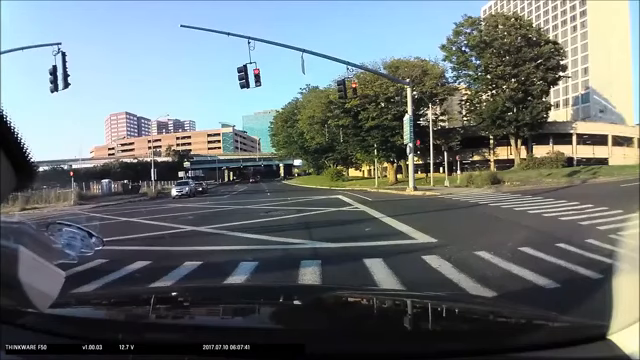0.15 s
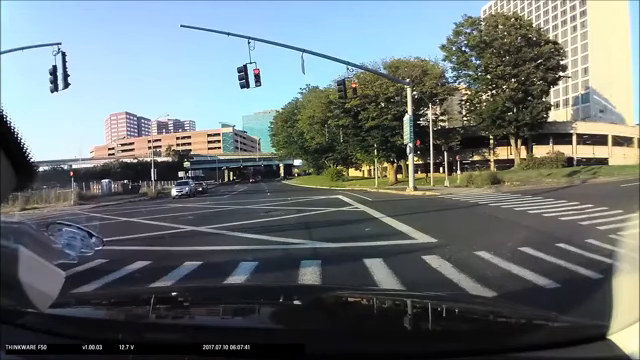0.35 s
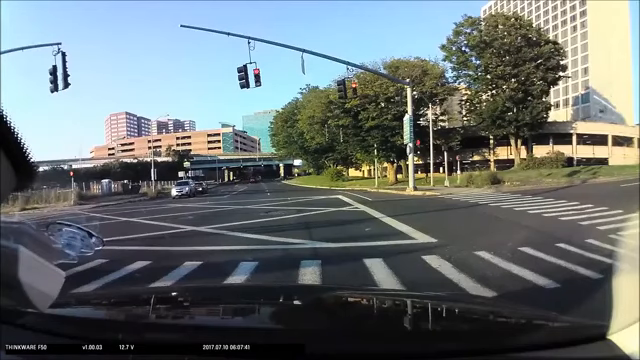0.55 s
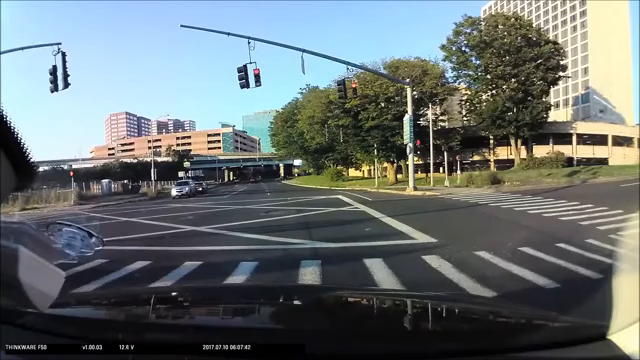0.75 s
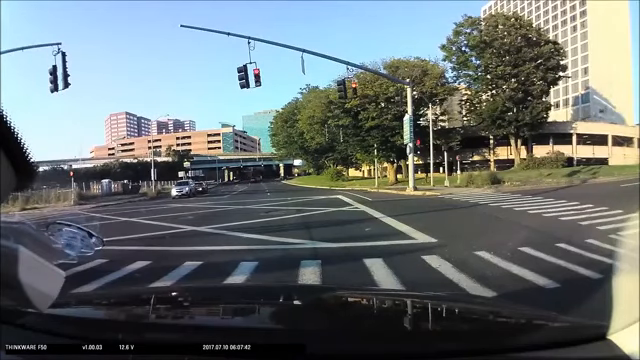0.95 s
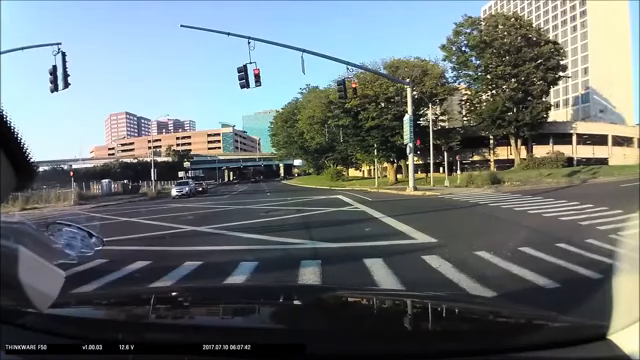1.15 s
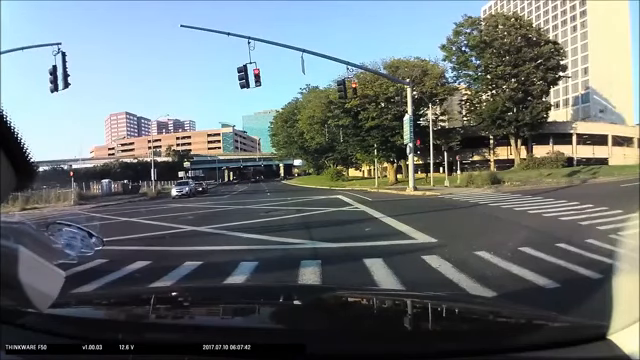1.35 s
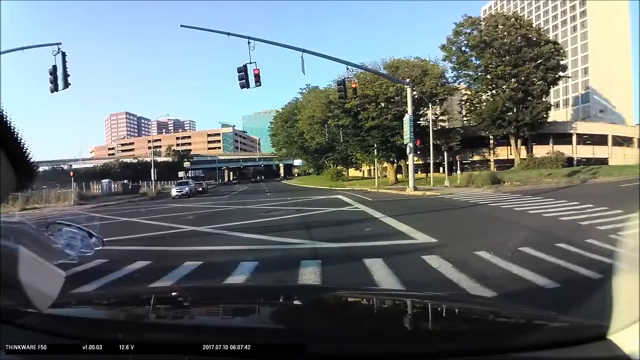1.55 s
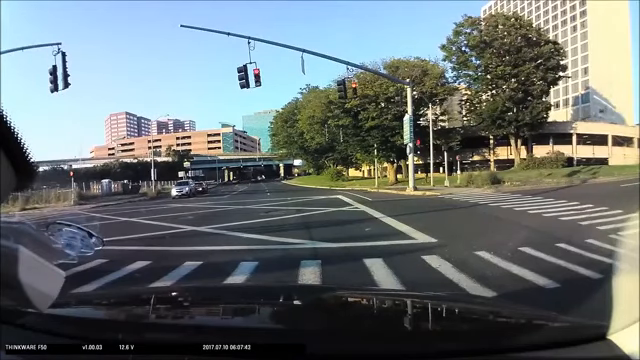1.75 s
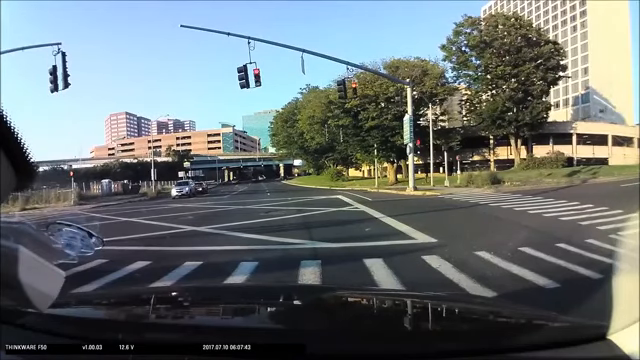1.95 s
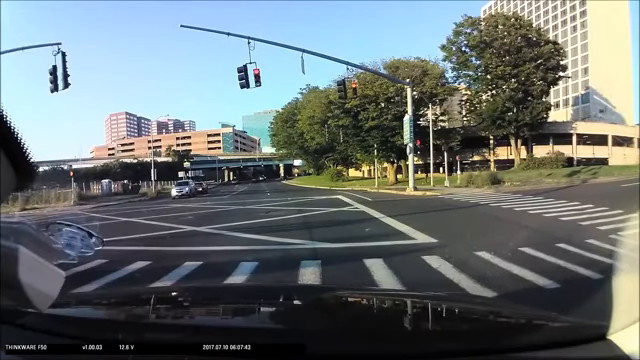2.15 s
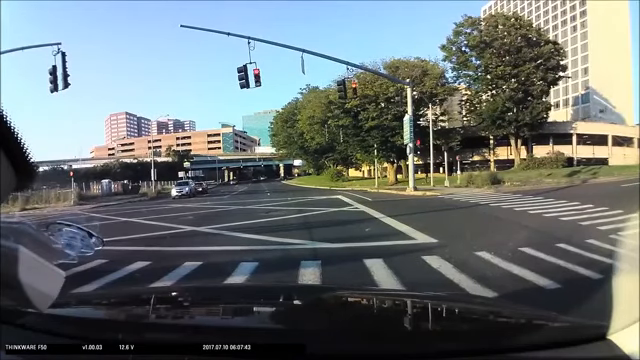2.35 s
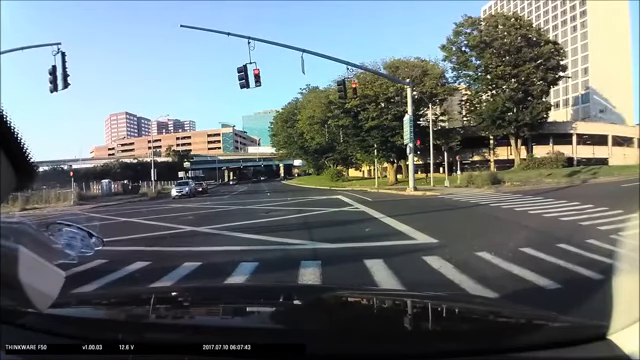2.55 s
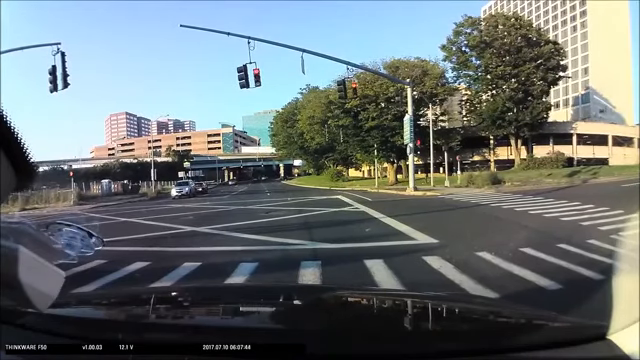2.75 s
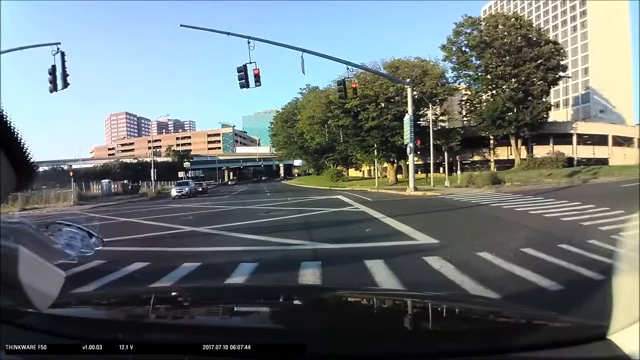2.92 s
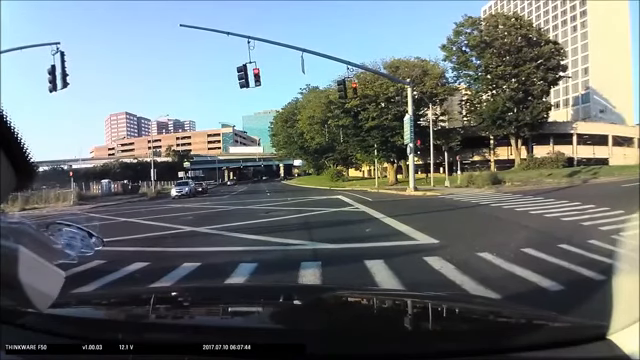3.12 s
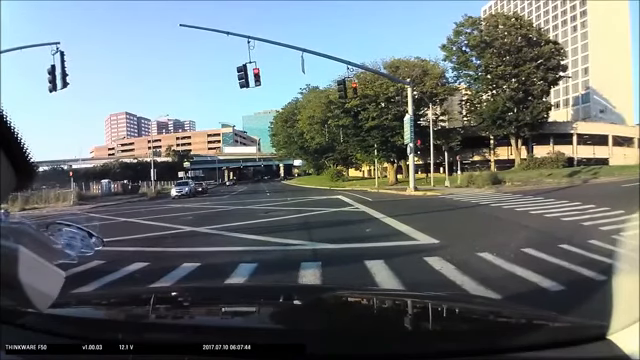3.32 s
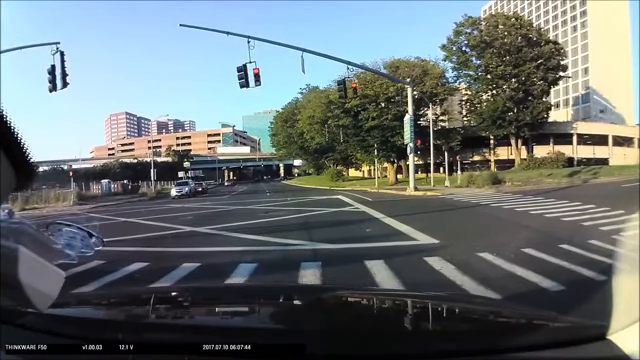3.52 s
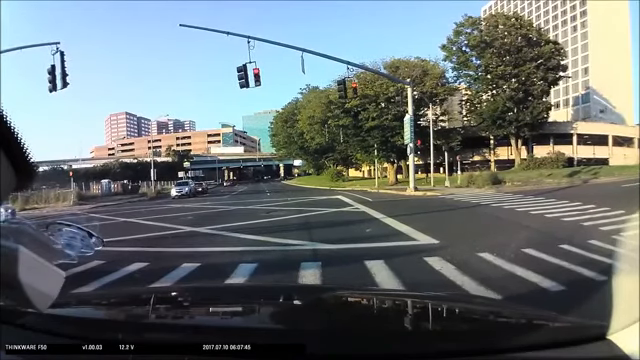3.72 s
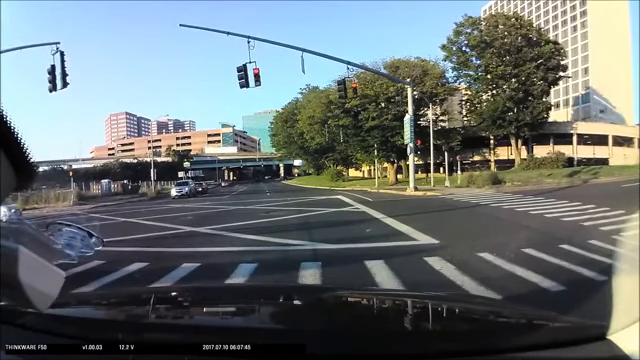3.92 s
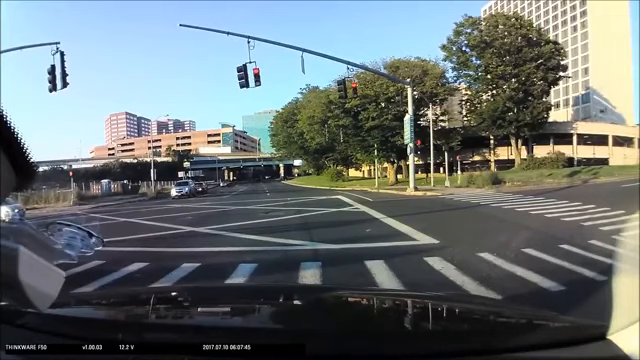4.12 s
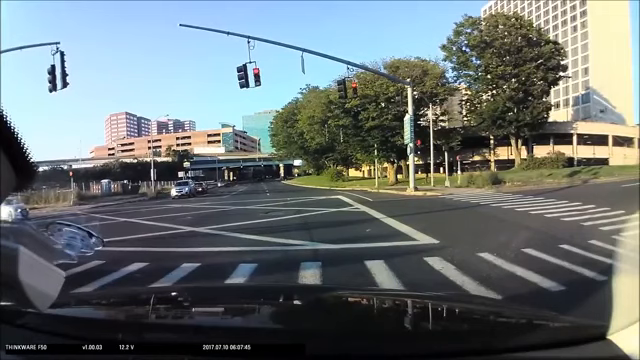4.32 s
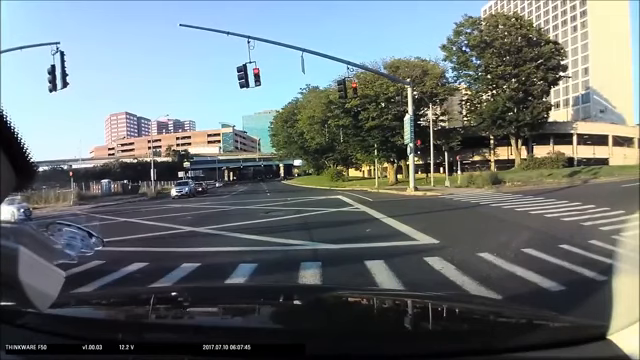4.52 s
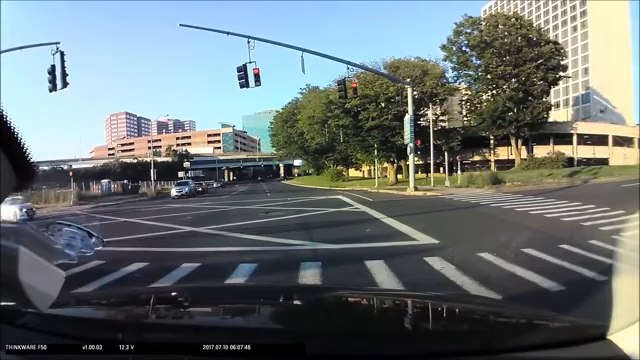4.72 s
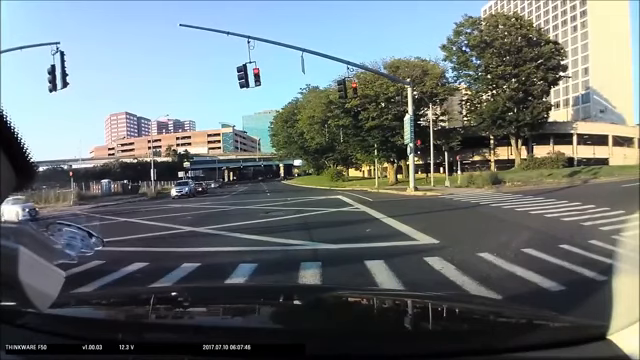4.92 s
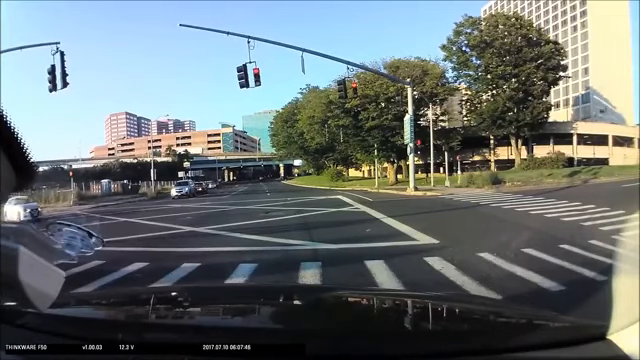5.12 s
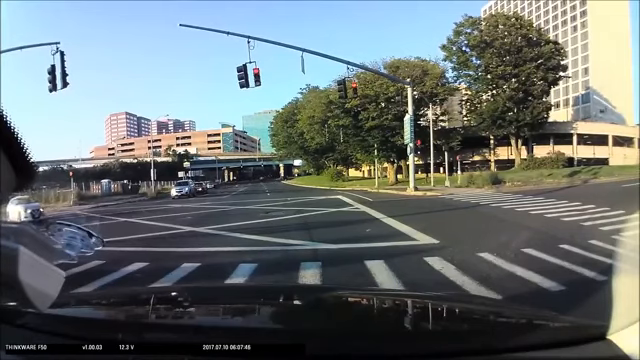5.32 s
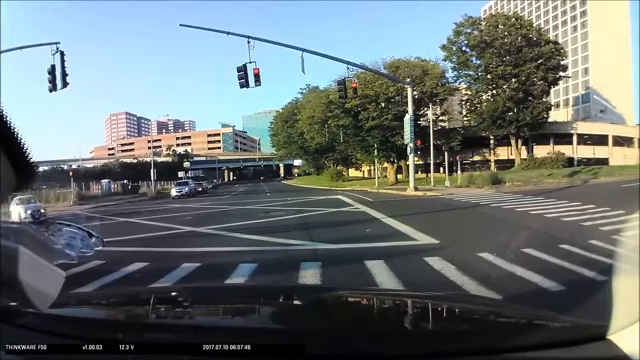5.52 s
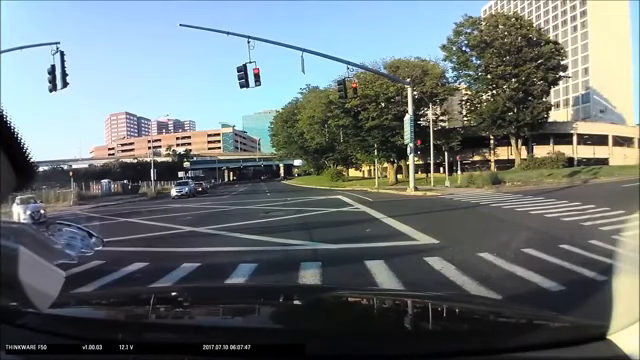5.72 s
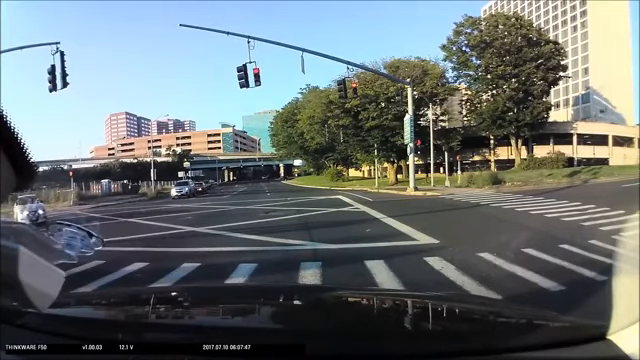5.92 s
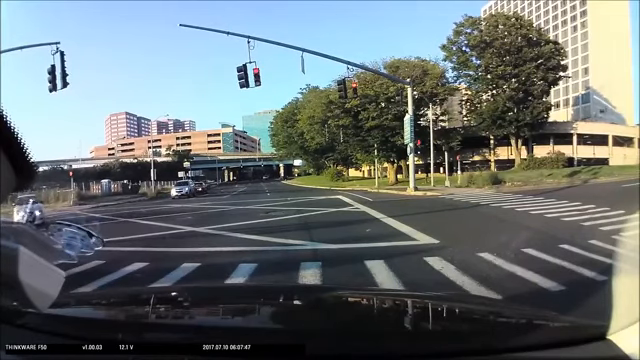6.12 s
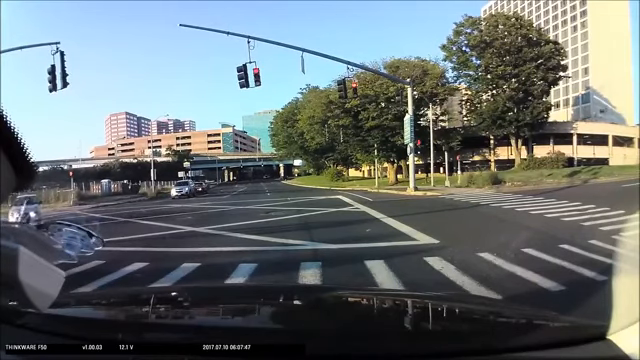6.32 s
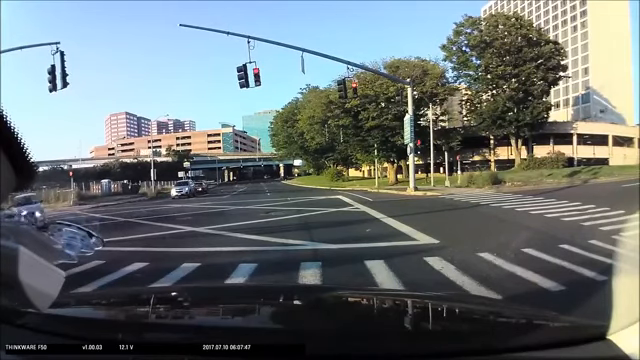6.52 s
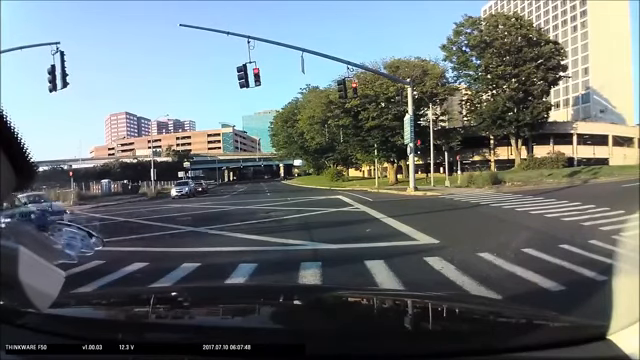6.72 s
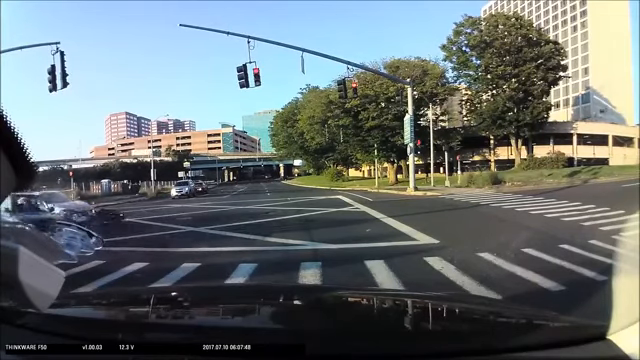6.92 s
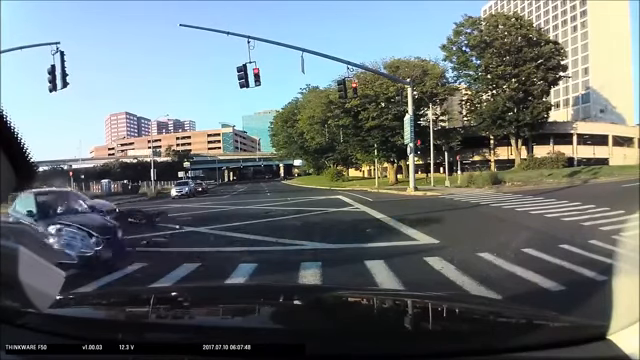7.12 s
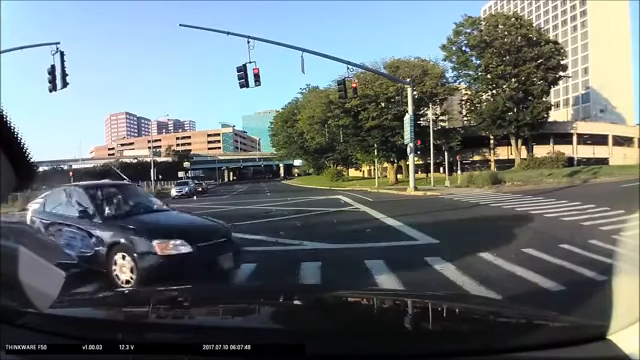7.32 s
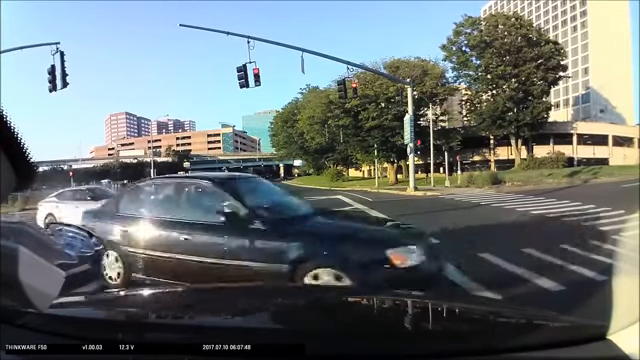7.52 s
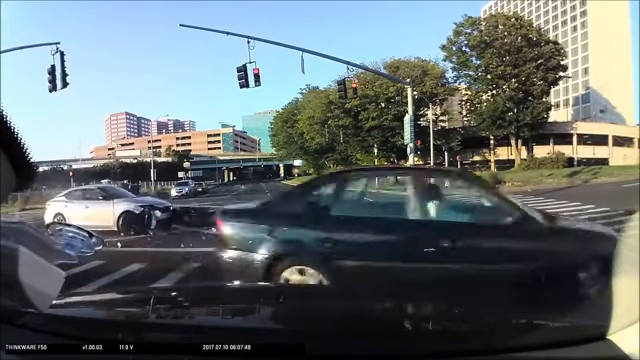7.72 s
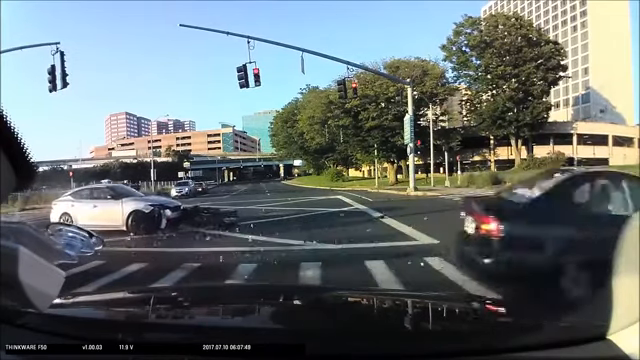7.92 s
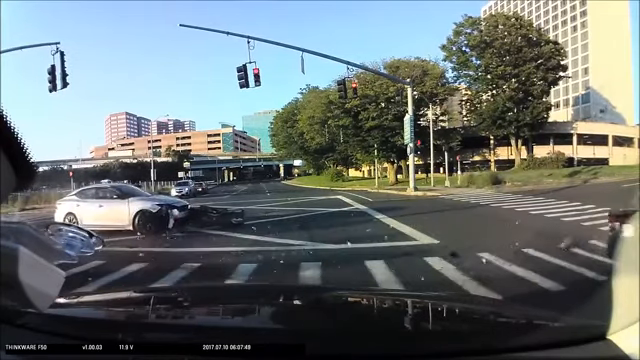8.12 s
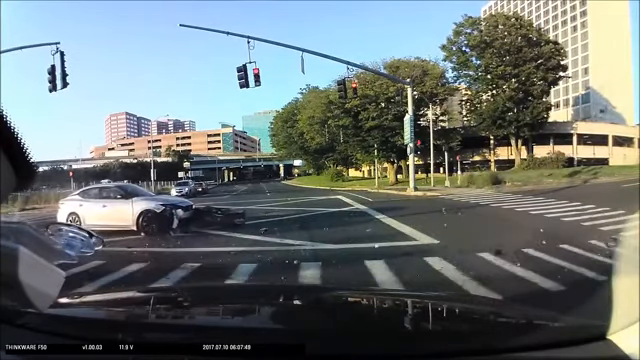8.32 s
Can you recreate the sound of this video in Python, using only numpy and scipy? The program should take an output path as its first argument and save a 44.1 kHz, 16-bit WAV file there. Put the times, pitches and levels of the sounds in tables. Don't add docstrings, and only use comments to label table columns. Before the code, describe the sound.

A quiet car cabin at a crossing, engine idling unevenly under thin electronic hiss. Small plastic clicks accompany a passing lorry's deep drone and loose rattles; later relay ticks come at regular intervals. A close, muffled smash erupts outside, followed by scraping, tyre squeal and ringing sheet metal. Debris knocks the doors and glass, the body booms, and a second cluster of crunches ends it.

```python
import sys
import numpy as np
from scipy import signal
from scipy.fft import rfft, irfft, next_fast_len
from scipy.io import wavfile
from scipy.ndimage import map_coordinates

SR = 44100
rng = np.random.default_rng(int(sys.argv[2]) if len(sys.argv) > 2 else 0)


def boost_factor(decibels):
    exponent = np.asarray(decibels, float) / 20
    return 10 ** exponent


def dump_mix(stems):
    frames = np.atleast_2d(stems).T
    limited = np.clip(frames, -1, 1)
    pcm = np.round(limited * 32767).astype(np.int16)
    wavfile.write(sys.argv[1], SR, pcm)


N = 373086
T = np.arange(N) / SR


def unit(x):
    return x / np.sqrt(np.mean(x ** 2) + 1e-20)


def curves(rows):
    s, *cols = np.transpose(rows)
    return [np.interp(T, s, c) for c in cols]


def during(rows, fade=0.071):
    return np.clip(np.minimum(T - rows[0][0], rows[-1][0] - T) / fade + 1, 0, 1)


def wobble(rate):
    return map_coordinates(rng.standard_normal(int(N * rate / SR) + 4), [T * rate])


def filtered(x, response):
    m = next_fast_len(N + SR // 2)
    return irfft(rfft(x, m) * response(np.fft.rfftfreq(m, 1 / SR)), m)[:N]


def resonances(modes):
    def response(f):
        total = 0
        for k, (c, w, db) in enumerate(modes):
            total = total + (-1) ** k * boost_factor(db) * 1j * f * w / (c * c - f * f + 1j * f * w)
        return total
    return response


def noise(spectrum, grain_db=0, grain_rate=100):
    f, db = np.transpose(spectrum)
    white = rng.standard_normal(N)
    if grain_db:
        white = white * boost_factor(grain_db * wobble(grain_rate))

    def colour(hz):
        return boost_factor(np.interp(np.log(hz + 1), np.log(f + 1), db, -150, -150))
    return unit(filtered(white, colour))


def tone(hz, blur_hz):
    return np.sqrt(2) * np.sin(2 * np.pi * np.cumsum(hz + blur_hz * wobble(blur_hz + 1)) / SR)


def rough(hz, width_hz):
    turn = 2 * np.pi * np.cumsum(hz) / SR
    return unit(wobble(width_hz) * np.sin(turn) + wobble(width_hz) * np.cos(turn))


def bursts(times, levels_db, t60, rise):
    power, t = np.zeros(N + SR), np.arange(SR // 2) / SR
    shape = (boost_factor(-60 * t / t60) * (1 - np.exp(-t / rise))) ** 2
    for s, db in zip(times, levels_db):
        power[round(s * SR):][:len(t)] += boost_factor(2 * db) * shape
    return np.sqrt(power[:N])


def ringing(rows, t60, rise, grain_db=0):
    out, t = np.zeros(N + SR), np.arange(SR) / SR
    for s, db, hz in rows:
        envelope = boost_factor(db - 60 * t / t60) * (1 - np.exp(-t / rise))
        out[round(s * SR):][:SR] += envelope * np.sin(2 * np.pi * hz * t)
    return out[:N] * boost_factor(grain_db * wobble(140))


# pitch_hz, level_db (per Hz)
HISS_COLOUR = [(2300, -40), (3800, -11), (5600, -12), (6000, -4), (7300, -2), (7900, -9), (9300, -3),
               (11200, -2), (11700, -12), (12100, -8), (12900, -9), (13300, -14), (15000, -14)]
# pitch_hz, level_db
CLOCK_TONES = [(6002, -88), (6998, -94), (7327, -97), (9001, -85), (10002, -109), (10998, -80.5),
               (11999, -104), (13001, -101)]
# time_s, pitch_hz, level_db
SUPPLY_WHINE = [(0, 13935, -83), (1.78, 13900, -82), (1.81, 13200, -92), (2.1, 13450, -83),
                (3.45, 13400, -85), (4.22, 13810, -86), (4.27, 13430, -82), (7.2, 13430, -84),
                (7.5, 13200, -95)]
# start_s, level_db
SUPPLY_CLICKS = [
    (1.8007, -55),
    (2.262, -59),
]


def electronics():
    hz, whine_db = curves(SUPPLY_WHINE)
    hiss = boost_factor(-70.5) * noise(HISS_COLOUR, grain_db=1.0, grain_rate=190)
    clock = sum(boost_factor(level + 2) * np.sin(2 * np.pi * f * T) for f, level in CLOCK_TONES)
    whine = boost_factor(whine_db) * rough(hz, width_hz=120)
    click_noise = noise([(2500, -14), (4000, -10), (14000, -9)])
    clicks = bursts(*np.transpose(SUPPLY_CLICKS), t60=0.03, rise=.0003) * click_noise
    return hiss + clock + whine + clicks


# time_s, roar_db
TRAFFIC = [(0, -70), (1.6, -69), (2.1, -70.5), (2.7, -69.5), (4.27, -70), (5.3, -68), (5.9, -65),
           (6.29, -61), (6.66, -61)]
# pitch_hz, level_db (per Hz)
ROAR_COLOUR = [(240, -50), (400, -6), (581, -3.5), (767, -6), (901, -3), (1200, -4.5), (1500, -7),
               (1650, -2.5), (2080, -16.5), (2300, -12), (2990, -52), (5060, -120)]
# pitch_hz, level_db (per Hz)
TYRE_HISS_COLOUR = [(1800, -12), (2300, -18.5), (2600, -3), (2800, -4.5), (3020, -0.5), (3300, -7),
                    (3550, -20), (4500, -32)]


def street():
    roar_db, = curves(TRAFFIC)
    far_db = -69.5
    hiss_db = -71.5 + 1.22 * (roar_db - far_db)
    swell = .7 * wobble(5)
    roar = boost_factor(roar_db + swell + 2.5) * noise(ROAR_COLOUR)
    hiss = boost_factor(hiss_db + swell + 1.1 * wobble(14)) * noise(TYRE_HISS_COLOUR, grain_db=1.0)
    return (T < WRECK_SLIDE[0][0]) * (roar + hiss)


# time_s, cycles_done (engine cycles)
CRANK_TURNS = [(0, -.065), (1.5, 8.901), (2.5, 14.821), (3, 17.798), (5, 29.814), (6, 35.773), (8.5, 50.62)]
# place (0-1 of a cycle), boom_db, panel_db
CYLINDER_FIRINGS = [
    (.03, -4.5, -6),
    (.235, -6.5, -12),
    (.51, 0, 0),
    (.745, -4.5, -6),
]
# pitch_hz, spread_hz
CABIN_BOOM = (197, 20.5)
# pitch_hz, width_hz, level_db
FLOOR_PANELS = [(262, 26.4, -2), (335, 11.3, -5.5)]
# multiple, level_db
FIRING_HUM = [(1, -51.5), (2, -55), (3, -57.5), (4, -53.5), (5, -55)]
# pitch_hz, level_db (per Hz)
IDLE_SHAKE = [(4, -32), (8, -19), (43, 13), (104, -11.5), (150, -29), (200, -3), (330, -8.5), (400, -26),
              (520, -24), (900, -55)]


def engine():
    s, done = np.transpose(CRANK_TURNS)
    boom, panel = np.zeros(N), np.zeros(N)
    chance = rng.standard_normal((len(CYLINDER_FIRINGS), 52, 2))
    for (place, boom_db, panel_db), luck in zip(CYLINDER_FIRINGS, chance):
        at = np.interp(np.arange(-1, 51) + place, done, s) + .0003 * luck[:, 0]
        keep = (at > 0) & (at < T[-1] - .02)
        size_db = .9 * luck[keep, 1]
        boom[(at[keep] * SR).astype(int)] = boost_factor(boom_db + size_db)
        panel[((at[keep] + .002) * SR).astype(int)] = boost_factor(panel_db + size_db)

    def swell(f):
        return np.exp(-.5 * ((f - CABIN_BOOM[0]) / CABIN_BOOM[1]) ** 2)

    def floor(f):
        return resonances(FLOOR_PANELS)(f) ** 2
    pulses = boost_factor(-44.5) * unit(filtered(boom, swell)) + boost_factor(-54) * unit(filtered(panel, floor))
    turn = 2 * np.pi * (4 * np.interp(T, s, done) + .2)
    hum = sum(boost_factor(db + 3 + 2.5 * wobble(3)) * np.sin(k * turn) for k, db in FIRING_HUM)
    return pulses + boost_factor(-4.5) * hum + boost_factor(-47.5) * noise(IDLE_SHAKE)


# time_s, pitch_hz, level_db
EXHAUST = [(1.72, 21.03, -60), (2.0, 21.8, -52), (2.08, 24.1, -25), (2.36, 27.4, -34), (2.45, 28.44, -31),
           (3.17, 32.5, -32.5), (3.23, 28.97, -41), (4.33, 26.47, -34), (4.9, 33.7, -46.5)]
# start_s, level_db
LURCHES = [
    (1.798, -26.5),
    (1.95, -31),
    (2.07, -26.5),
    (2.2, -38),
    (3.5, -35),
    (4.17, -30),
    (4.53, -33.5),
]
# start_s, end_s, pitch_hz, level_db
BRAKE_SQUEAKS = [
    (2.583, 2.802, 3080, -71.5),
    (3.172, 3.325, 2590, -77),
    (3.2, 3.265, 3170, -71),
]


def lorry():
    hz, db = curves(EXHAUST)
    s, lurch_db = np.transpose(LURCHES)
    note = boost_factor(db + 2.6 * wobble(9.1)) * tone(hz, blur_hz=1.3)
    push = np.hypot(boost_factor(db - 12), bursts(s, lurch_db, t60=0.62, rise=0.047))
    upper = push * noise([(30, -47.0), (42, -13.5), (54, 11), (64, -12), (90, -72.0)])
    shake = np.hypot(boost_factor(-74), bursts(s, lurch_db - 28.5, t60=.7, rise=.01))
    load_colour = [(250, -24), (400, 3), (700, -1), (1000, -11.5), (1500, -42)]
    load = shake * noise(load_colour, grain_db=-0.5, grain_rate=44)
    brakes = 0
    for start, end, pitch, level in BRAKE_SQUEAKS:
        brakes = brakes + boost_factor(level) * during([[start], [end]]) * rough(pitch + 0 * T, width_hz=110)
    return during(EXHAUST, fade=0.15) * (note + upper + load) + brakes


# start_s, peak_db, body_db, top_db
CLICKS = [(1.806, -57.5, 8, -20), (1.826, -57, 7, -18), (1.8494, -65, 6, -16), (1.9704, -63.5, 15, -25),
          (2.0894, -62, 3, -9), (4.1765, -51, 11, -4), (4.2544, -68.5, 20.5, -14), (4.4632, -58, 11, -6),
          (4.8688, -58.5, 5, -1.5), (5.264, -54, 16.5, -5.5), (5.66, -54.5, 7, -4.5),
          (6.0591, -60, 2, -27.5)]
# start_s, peak_db, pitch_hz
RELAY_CASE = [
    (4.4657, -53, 1460),
    (4.8703, -50, 1410),
    (5.2666, -45, 1537),
    (5.29, -43, 1575),
    (5.663, -47.5, 1460),
]


def dashboard():
    s, db, body_db, top_db = np.transpose(CLICKS)
    low_noise = noise(DOOR_COLOUR, grain_db=-1.5, grain_rate=240)
    low = bursts(s, db + body_db - 7.5, t60=.12, rise=0.00083) * low_noise
    mid = bursts(s, db - 1, t60=.11, rise=.0005) * noise(OPENING_COLOUR, grain_db=2, grain_rate=300)
    top_noise = noise([(3500, -38), (4200, 3), (5600, 1), (6300, -20), (7000, -54)])
    top = bursts(s, db + top_db - 4.5, t60=0.11, rise=.0005) * top_noise
    case = ringing(RELAY_CASE, t60=0.084, rise=0.0027, grain_db=3.0)
    return low + mid + top + boost_factor(-1.5) * case


# time_s, sway_db
SWAY = [(0, -47.5), (1.75, -47.5), (1.92, -35.5), (2.7, -38), (3.3, -42.5), (3.7, -37), (4.0, -40),
        (4.36, -39), (4.9, -43), (6.6, -48.5), (6.75, -33.5), (7.16, -30.5), (7.42, -20), (7.8, -26),
        (8.08, -25), (8.2, -30), (8.46, -23)]
# pitch_hz, level_db (per Hz)
SWAY_COLOUR = [(3, -1), (8, -0.5), (30, 2.5), (60, -12), (90, -36), (200, -120)]
RUMBLE_COLOUR = [(30, -65), (60, -4), (140, -10.5), (260, -19), (500, -37.5), (2000, -120)]
# start_s, level_db, pitch_hz, t60_s
SHELL_BLOW = (7.3125, 5, 41, .11)
AIR_HEAVE = (7.345, -9, 5, .8)
# start_s, level_db, pitch_hz
SHELL_BOOMS = [(6.688, -22.5, 262), (6.72, -21.5, 68.4), (6.8, -28.5, 128.4), (7.33, -22, 104.9),
               (7.46, -22.5, 45), (7.98, -25, 26.8), (8.12, -22, 29.3), (8.27, -24, 119.5),
               (8.3, -26, 28.1), (8.449, -9, 28), (1.815, -33.5, 116), (1.9, -24.5, 48.5),
               (4.52, -32, 105.9)]


def body():
    sway_db, = curves(SWAY)
    rest_db = -47
    rumble_db = -51.5 + 0.59 * (sway_db - rest_db)
    sway = boost_factor(sway_db - 3.5) * noise(SWAY_COLOUR)
    rumble = boost_factor(rumble_db + 2.5) * noise(RUMBLE_COLOUR, grain_db=2.5, grain_rate=25)
    push = ringing([SHELL_BLOW[:3]], SHELL_BLOW[3], rise=.002)
    dent = .43 * np.tanh(push / .43)
    heave = ringing([AIR_HEAVE[:3]], AIR_HEAVE[3], rise=.02)
    return sway + rumble + dent - heave + ringing(SHELL_BOOMS, t60=0.53, rise=0.009)


# time_s, roar_db
WRECK_SLIDE = [(6.69, -43), (6.73, -41), (6.84, -39.5), (6.92, -45.5), (7.16, -46), (7.3, -43.5),
               (7.42, -46), (7.66, -57), (8.46, -49)]
# pitch_hz, level_db (per Hz)
DOOR_COLOUR = [(190, -47), (330, -7.5), (409, 1.5), (472, -15.5), (507, -2), (553, -0.5), (809, -2.5),
               (904, 1.5), (979, -5), (1110, -3), (1340, -5.5), (1610, -3.5), (2200, -15), (2860, -47),
               (4840, -120)]
# pitch_hz, level_db (per Hz)
OPENING_COLOUR = [(1300, -44), (2050, -15.5), (2400, -8), (2600, -6.5), (2870, -1), (3200, -1),
                  (3450, -10.5), (3800, -19.5), (4400, -23), (5200, -33.5), (6400, -36.5), (7200, -53),
                  (8000, -80)]
# pitch_hz, level_db (per Hz)
GLASS_COLOUR = [(2500, -30), (4200, -0.5), (6300, -5.5), (7200, -14), (8500, -14.5), (9700, -11),
                (12600, -18), (13600, -35), (15000, -32)]
# time_s, pitch_hz, level_db
SKID = [(6.86, 964, -42), (6.898, 916, -36.5), (6.96, 925, -41), (7.038, 960, -34.5), (7.078, 1068, -40),
        (7.138, 1149, -38), (7.23, 1080, -49), (7.29, 1000, -51), (7.32, 1100, -43)]
# start_s, peak_db, pitch_hz
METAL_RINGS = [
    (6.776, -24.5, 1597),
    (6.85, -28, 2490),
    (6.8803, -21.5, 2490),
    (7.02, -27, 1607),
    (7.035, -31, 1660),
    (7.055, -37, 2120),
    (7.3376, -33, 2590),
    (7.343, -30, 3700),
    (7.625, -38, 1700),
    (7.76, -36, 601),
]
# start_s, level_db, t60_s, rise_s
GLASS_SHOWER = (7.2, -44, .8, .07)
# start_s, peak_db, weight_db
CRUMPLES = [(6.6697, -29, -11), (6.6805, -16.5, -1), (6.6952, -11, -6), (6.7246, -12, -20),
            (6.7424, -19.5, -2), (6.782, -23.5, 2), (6.849, -26, -20), (6.8818, -31.5, -5.5),
            (7.021, -32, -19), (8.2195, -26.5, 7), (8.231, -23.5, -13), (8.248, -18, -15), (8.2684, -24, 2),
            (8.3304, -25.5, 2.5), (8.4514, -20, -5)]
# start_s, peak_db, weight_db, nearness_db
DEBRIS_HITS = [(7.2215, -36, 1, -32), (7.262, -32.5, 7, -20), (7.3376, -22.5, -10, -24),
               (7.3544, -23.5, -23, -21.5), (7.415, -31.5, -4, -6), (7.5584, -40, -10, -17),
               (7.58, -26.5, -8, -29.5), (7.5916, -38.5, 0, -18), (7.622, -28, -18, -14),
               (7.635, -41, -15, -11), (7.7594, -47.5, 17.5, -12.5), (7.844, -38.5, -4, -37),
               (7.9194, -41, 11.5, -26), (8.0324, -38, -12, -37), (8.0594, -52.5, 17, -6),
               (8.1184, -39, 7, -33), (8.19, -43.5, 5, -16), (8.262, -29.5, -5, -22),
               (8.4396, -34.5, 16.5, -12)]


def crash():
    cars = [(s, db, weight, -3.5, -50) for s, db, weight in CRUMPLES]
    pieces = [(s, db, weight, 10 + .6 * near, near) for s, db, weight, near in DEBRIS_HITS]
    s, db, thud_db, body_db, grit_db = np.transpose(cars + pieces)

    roar_db, = curves(WRECK_SLIDE)
    usual_db = -47.5
    sliding = during(WRECK_SLIDE, fade=.01)
    roar = sliding * boost_factor(roar_db)
    scrape = sliding * boost_factor(-48 + 1.54 * (roar_db - usual_db))
    shower = bursts([GLASS_SHOWER[0]], [GLASS_SHOWER[1]], *GLASS_SHOWER[2:])
    grit = np.hypot(sliding * boost_factor(-72), shower)

    thud_noise = noise([(40, -42), (70, 2.5), (140, -0.5), (260, -3.5), (420, -11), (700, -17)])
    thud = bursts(s, db + thud_db - 4.0, t60=0.33, rise=0.0089) * thud_noise
    door_blows = bursts(s, db + body_db - 7, t60=0.21, rise=0.0043)
    doors = np.hypot(roar, door_blows) * noise(DOOR_COLOUR, grain_db=2.0, grain_rate=120)
    opening_blows = bursts(s, db - 9.5, t60=0.2, rise=0.0027)
    opening = np.hypot(scrape, opening_blows) * noise(OPENING_COLOUR, grain_db=0.0, grain_rate=120)
    splinters = bursts(s, db + grit_db + 0.5, t60=0.13, rise=0.00059)
    glass = np.hypot(grit, splinters) * noise(GLASS_COLOUR, grain_db=2.5, grain_rate=500)

    hz, tyre_db = curves(SKID)
    tyres = rough(hz, width_hz=170) + .35 * rough(1.18 * hz, width_hz=210)
    panel_db = -46 + 0.51 * (tyre_db - tyre_db.max() + 5)
    panel = boost_factor(panel_db + 2.0) * rough(1650 + 15 * wobble(15), width_hz=260)
    skid = during(SKID) * (boost_factor(tyre_db - 0.5 + 2.0 * wobble(60)) * tyres + panel)
    rings = boost_factor(-1.5) * ringing(METAL_RINGS, t60=0.11, rise=0.004, grain_db=5.5)
    return thud + doors + opening + glass + skid + rings


def scene():
    return (street() + engine() + lorry() + dashboard() + body() + crash())[None]


def low_pass(x):
    return signal.sosfilt(signal.butter(12, 14990, fs=SR, output="sos"), x)


def record(dry):
    opening = np.clip(T / .006, 0, 1)
    return low_pass(opening * (dry + electronics()))


dry = scene()
out = record(dry)
dump_mix(out)
```